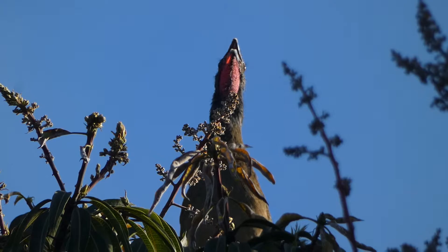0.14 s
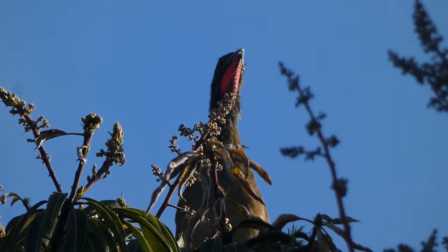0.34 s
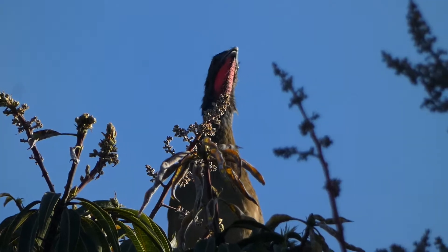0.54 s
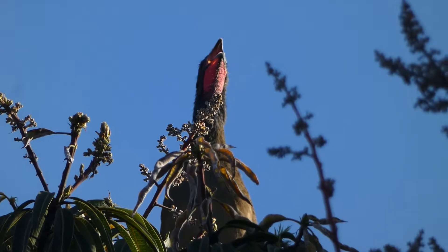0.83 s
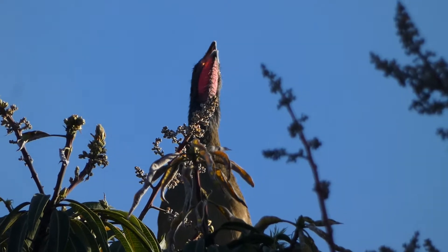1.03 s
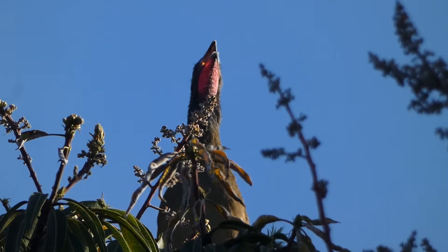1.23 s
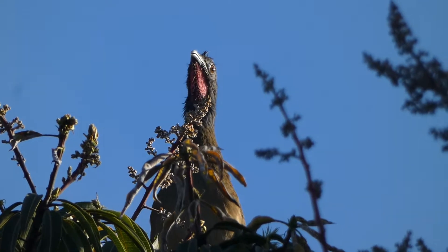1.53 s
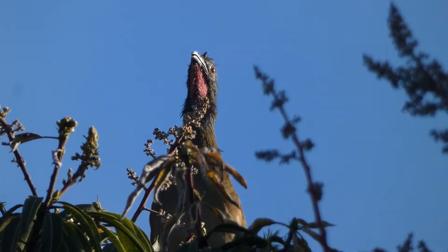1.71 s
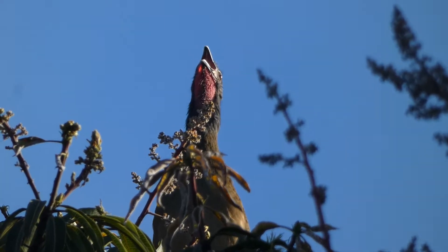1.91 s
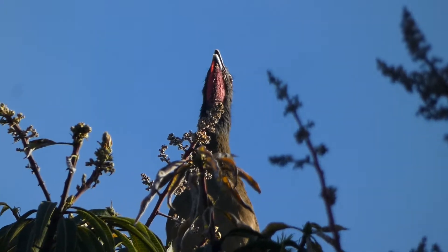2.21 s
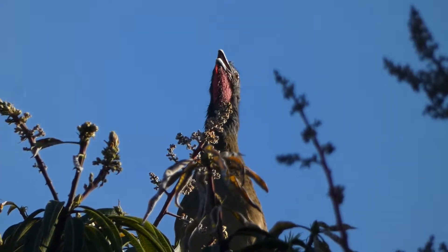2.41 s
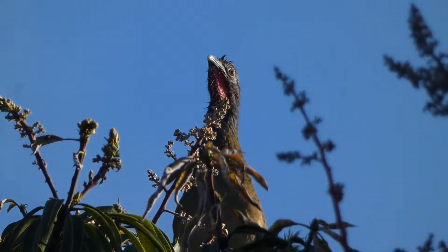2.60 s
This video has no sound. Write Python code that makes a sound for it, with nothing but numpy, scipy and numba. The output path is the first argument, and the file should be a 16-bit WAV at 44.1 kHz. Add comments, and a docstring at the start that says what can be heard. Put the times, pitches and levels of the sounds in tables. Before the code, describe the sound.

Harsh, rhythmic cackling of two big birds, raspy squawks alternating and overlapping with deeper gliding honks, fairly close outdoors in stereo; short leafy echoes, a faint wavering bird far right and soft low traffic rumble behind.

```python
"""Two large game birds duet from a treetop: a higher, rasping voice and a lower, honking one, each a train of
uneven syrinx pulses ringing a windpipe. Far off to the right another bird adds thin notes, each a single wavering
partial. Trees around the microphone echo all three as decaying noise, over a wash of distant traffic (shaped
noise) and a low hum (a wavering sine)."""
import sys
import numpy as np
from scipy import signal
from scipy.fft import rfft, irfft
from scipy.io import wavfile
from scipy.ndimage import uniform_filter1d
from numba import njit

SR = 44100
rng = np.random.default_rng(int(sys.argv[2]) if len(sys.argv) > 2 else 0)


def wav_record(signal):
    """Record a signal, one row per channel, as 16-bit PCM in the file named by sys.argv[1]."""
    frames = np.transpose(np.atleast_2d(signal))
    bounded = np.clip(frames, -1, 1)
    # unit amplitude maps onto the largest positive 16-bit level
    quanta = np.round(bounded * 32767).astype(np.int16)
    wavfile.write(sys.argv[1], SR, quanta)


def elevation(decibels):
    """Turn decibel levels (scalar or array-like) into linear amplitude ratios."""
    levels = np.asarray(decibels, float)
    return 10 ** (levels / 20)


N = 121275  # length in samples
LEFT_RIGHT = np.array([[1], [-1]])


@njit
def moving_bandpass(x, hz, width):
    """State-variable resonator whose centre may move from sample to sample."""
    y, b, l = np.empty(len(x)), 0., 0.
    for i in range(len(x)):
        g, k = np.tan(np.pi * hz[i] / SR), width / hz[i]
        v = (b + g * (x[i] - l)) / (1 + g * (g + k))
        b, l, y[i] = 2 * v - b, l + 2 * g * v, k * v
    return y


def fixed_bandpass(x, hz, width):
    """Resonator with its centre held still."""
    return moving_bandpass(x, np.full(len(x), 1. * hz), 1. * width)


def unit(x):
    """Scale to rms 1."""
    return x / np.sqrt(np.mean(x ** 2))


def walk(rate):
    """Smooth random wander of rms 1: noise averaged twice over 1 / rate seconds."""
    k = max(int(SR / rate), 1)
    return unit(uniform_filter1d(uniform_filter1d(rng.standard_normal(N), k), k))


def pan(left_minus_right_db):
    """Gains of the left and right channels, half the difference on each."""
    return elevation(.5 * LEFT_RIGHT * left_minus_right_db)


def shape(notes, attack_s, attack_share, release_s):
    """Breath gain of the notes, the row of the current note, time since it began and how far along it is."""
    t, notes = np.arange(N) / SR, np.array(notes)
    current = np.clip(np.searchsorted(notes[:, 0], t) - 1, 0, None)
    row = notes[current].T
    start, length, level, swell = row[:4]
    since = np.maximum(t - start, 0)
    along = np.clip(since / length, 0, 1)
    # the attack lengthens by a share of any note length over 0.1 s
    rise = np.clip(since / (attack_s + attack_share * np.maximum(length - .1, 0)), 0, 1)
    into_release = np.maximum(since - length + release_s, 0)
    gate = rise ** 2 * np.exp(-2 * into_release ** 2 / release_s ** 2)
    return gate * elevation(level + swell * (along - .5)), row, since, along


def syrinx(hz, rough):
    """Pulses of uneven spacing and size; rough flow adds a puff of noise to each cycle."""
    rough = np.clip(rough, 0, 1)
    jitter = rough * (.05 * walk(80) + .2 * walk(700))
    step = hz * np.clip(1 + jitter, .3, 3) / SR
    phase = np.cumsum(step)
    at = np.flatnonzero(np.diff(np.floor(phase))) + 1
    size = elevation((4.85 * rough * walk(1280))[at])
    # each pulse falls between two samples and is shared by them
    late = phase[at] % 1 / step[at]
    pulses = np.zeros(N)
    pulses[at - 1], pulses[at] = size * late, size * (1 - late)
    puffs = unit(np.exp(-(phase % 1) / 0.44) * rng.standard_normal(N))
    return np.sqrt(1 - rough ** 2) * unit(pulses - pulses.mean()) + rough * puffs


def windpipe(low, high, pipe, tuning, throat, lowest_db=0, pan_db=0):
    """Resonances of alternate sign, panned singly or all alike; steady breath evens the level."""
    out = 0
    for k, (hz, width, db, *own_pan_db) in enumerate(pipe):
        centre = hz * tuning * (throat if k == 1 else 1)  # the throat is the second resonance
        source = low if k < 2 else high
        narrow = moving_bandpass(source, centre, 1. * width)
        ring = unit(moving_bandpass(narrow, centre, 3. * width))
        level = elevation(db + (lowest_db if k == 0 else 0))
        out = out + (-1) ** k * level * ring * pan((own_pan_db or [pan_db])[0])
    return out / np.sqrt(uniform_filter1d(np.mean(out ** 2, axis=0), size=600))


# Notes of the higher bird in the treetop: start t/s, length t/s, mid-note level/dB, swell over the note/dB,
# settled throat resonance f/Hz (before wander), mid-note roughness (0-1)
HIGH_CALLS = [(.082, 0.13, -24.5, -10, 1406, 0.81), (.71, .12, -22.5, 0.5, 1459, 0.7),
              (.865, 0.052, -24, -9.5, 1250, 0.69), (.935, 0.035, -20, 4, 1290, 0.7),
              (.974, .038, -18.5, 16, 1366, 0.5), (1.015, .075, -27, -16, 1430, 0.5),
              (1.18, 0.152, -24, -12, 1301, .7), (1.858, 0.11, -23, 4, 1400, 0.67),
              (2.016, 0.051, -24, -11, 1216, 0.7), (2.082, 0.036, -19.5, 4.5, 1350, 0.66),
              (2.123, 0.1, -22, -7.5, 1434, 0.55), (2.338, 0.14, -24, -11.5, 1461, 0.71)]
# Its windpipe, settled: resonance f/Hz, width of the narrower of two filters f/Hz, relative level/dB
HIGH_WINDPIPE = [(1090, 620, -10), (1400, 180, -3), (1887, 175, -7.5), (3395, 644, -1.5), (5310, 740, -1.5),
                 (7034, 560, -9), (8846, 680, -15), (10290, 930, -23), (12900, 3000, -32.5)]


def high_bird():
    """Rasping notes: fast chaotic pulses near the pipe's own pitch, starting sharp; the throat drops into each."""
    pulse_hz = 1880  # once settled
    onset_sharp, onset_s = 0.096, 0.0041  # the pipe starts sharp by this share and settles
    throat_sharp, throat_s = .35, .008  # the throat opens sharp and drops into place
    clear_s = .014  # notes begin and end clearer than their middle
    earlier_db, earlier_s = -39, 0.59  # an earlier note still dying away at the start

    gain, row, since, _ = shape(HIGH_CALLS, attack_s=.005, attack_share=.6, release_s=.022)
    length, throat_hz, rough = row[1], row[4], row[5]
    since = np.where(since > 0, since, 1)  # what dies away at the start has long settled
    tuning = (1 + onset_sharp * np.exp(-since / onset_s)) * (1 + .012 * walk(70))
    clear = np.exp(-since / clear_s) + np.exp(-np.maximum(length - since, 0) / (2 * clear_s))
    source = syrinx(pulse_hz * tuning, rough * (1 - .6 * np.minimum(clear, 1)))
    drop = 1 + throat_sharp * np.exp(-since / throat_s)
    throat = throat_hz / HIGH_WINDPIPE[1][0] * drop * (1 + .035 * walk(45))
    voice = windpipe(source, source, HIGH_WINDPIPE, tuning, throat, pan_db=-4)
    earlier = elevation(earlier_db) * np.exp(-np.arange(N) / SR / earlier_s)
    return (gain + earlier) * voice


# Notes of the lower bird in the treetop: start t/s, length t/s, mid-note level/dB, swell over the note/dB,
# pulse rate at start f/Hz, at end f/Hz, lift of the lowest resonance at mid-note, level/dB
LOW_CALLS = [(.24, .14, -28, 12.5, 425.1, 564, 9), (.434, 0.067, -25.5, -8, 525.5, 467, 1.5),
             (.527, 0.05, -21, -5, 552.6, 548, 8), (.58, 0.048, -21.5, -10, 550.4, 559, 9),
             (.745, 0.16, -24.5, -7, 558.7, 500.6, 4), (1.37, .14, -27, 14.5, 445.9, 570.9, 12.5),
             (1.568, .06, -25, -4, 499.7, 470, 3.5), (1.663, 0.046, -21, -8.5, 548, 552.3, 7.5),
             (1.715, 0.052, -22.5, -13, 552.8, 560, 10.5), (1.88, 0.19, -24.5, -10, 558.9, 496.8, 5)]
# Its windpipe at the 555 Hz pulse rate, throat settled: resonance f/Hz, width of the narrower of two filters f/Hz,
# relative level/dB, left channel minus right level/dB
LOW_WINDPIPE = [(578, 110, -15.5, 1.5), (1039, 233, 1.5, -0.5), (1510, 530, -4, -5), (2280, 280, -7, -6),
                (3170, 680, -10.5, -1), (3840, 213, -6, -4), (4820, 930, -9.5, -3.5),
                (6600, 2100, -15.5, -4.5), (9300, 1520, -20.5, -6), (13200, 5300, -41, -4.5)]


def low_bird():
    """Honking notes that arch and glide: a steadier tone below, a rasp above; the lowest partial fills the middle."""
    tone_rough, rasp_rough = .35, .6  # steadier and chaotic side of the syrinx (0-1)
    pitch_arch = .05  # share by which pitch rises in mid-note
    throat_sharp, throat_s = .35, .008  # the throat opens sharp and drops into place

    gain, row, since, along = shape(LOW_CALLS, attack_s=.012, attack_share=.25, release_s=.012)
    start_hz, end_hz, lowest_db = row[4:7]
    arch = np.sin(np.pi * along)
    hz = (start_hz + (end_hz - start_hz) * along) * (1 + pitch_arch * arch)
    tuning = np.sqrt(hz / 555)  # the pipe follows the pitch part of the way
    throat = tuning * (1 + throat_sharp * np.exp(-since / throat_s))
    tone, rasp = syrinx(hz, tone_rough), syrinx(hz, rasp_rough)
    return gain * windpipe(tone, rasp, LOW_WINDPIPE, tuning, throat, lowest_db - 18 * (1 - arch))


# Notes of the far bird, off to the right: start t/s, length t/s, mid-note level/dB before flicker and pan,
# swell over the note/dB, mean pitch f/Hz
FAR_CALLS = [(.17, 0.24, -39, -16, 1252), (.64, 0.1, -42, 7, 1316), (.885, 0.094, -33.5, -2, 1231),
             (1.24, .13, -38, -10, 1279), (2.39, 0.31, -44, -29, 1247)]


def far_bird():
    """Thin, wavering, flickering notes of which only one partial carries."""
    flicker_db, pan_db = 5, -10  # rms flicker; left minus right
    gain, row, _, _ = shape(FAR_CALLS, attack_s=.012, attack_share=.25, release_s=.012)
    hz = row[4] * (1 + 0.022 * walk(50))
    tone = np.sqrt(2) * np.sin(2 * np.pi * np.cumsum(hz) / SR)
    return gain * tone * elevation(flicker_db * walk(50)) * pan(pan_db)


def fade(noise, t60):
    """Noise dying by 60 dB in t60 seconds, scaled to energy 1."""
    dying = noise * elevation(-60 * np.arange(SR) / SR / t60)
    return dying / np.sqrt(np.sum(dying ** 2))


# Echo from the trees around, by band: centre f/Hz, fall by 60 dB t/s, level against the direct sound/dB
TREE_ECHO = [(1086, 0.8, -19.5), (2610, 0.56, -10.5), (4780, 0.59, -17.5), (10000, 0.26, -15)]


def trees(x):
    """Near twigs scatter at once; the trees around give a thin tail, different on each side."""
    twigs_t60_s, twigs_db = 0.08, -3
    sides = []
    for _ in range(2):
        echo = 0
        for hz, t60, db in TREE_ECHO:
            noise = fixed_bandpass(rng.standard_normal(SR), hz, 0.23 * hz)
            echo = echo + elevation(db) * fade(noise, t60)
        bright = np.diff(rng.standard_normal(SR + 2), 2)  # differencing twice favours the treble
        echo = echo + elevation(twigs_db) * fade(bright, twigs_t60_s)
        sides.append(signal.fftconvolve(x, echo)[:N])
    return np.array(sides)


# Spectrum of the distant traffic at the microphone: f/Hz, relative level per Hz/dB
TRAFFIC_SPECTRUM = [(40, -23), (90, -1), (250, -3.5), (1000, -4.5), (3000, -14.5), (15000, -49)]


def traffic():
    """Distant wash of shaped noise, partly shared by both sides, its level drifting slowly."""
    level_db = -43.5  # rms, before the drift
    hz = np.arange(N // 2 + 1) * SR / N + 1
    f, db = np.array(TRAFFIC_SPECTRUM).T
    colour = elevation(np.interp(np.log(hz), np.log(f), db))
    mid, side = (irfft(rfft(rng.standard_normal(N)) * colour, N) for _ in range(2))
    return unit(mid + 0.67 * side * LEFT_RIGHT) * elevation(level_db + walk(1))


# Course of the background hum: t/s, level before wavering and side gains/dB
HUM_LEVEL = [(0, -76), (0.401, -54.5), (.75, -48), (1.3, -57), (2.75, -62)]


def hum():
    """Low sine wavering in pitch and level, a little stronger on the left."""
    hz = 91 * (1 + 0.025 * walk(5.1))
    tone = np.sqrt(2) * np.sin(2 * np.pi * np.cumsum(hz) / SR)
    level_db = np.interp(np.arange(N) / SR, *np.array(HUM_LEVEL).T) + 0.74 * walk(15)
    return np.array([[1.2], [.8]]) * tone * elevation(level_db)


def scene():
    """The birds, their echo from the trees, and the background."""
    birds = high_bird() + low_bird() + far_bird()
    return birds + trees(birds.mean(axis=0)) + traffic() + hum()


def roll_off(x):
    """The treble ends steeply here."""
    return signal.sosfilt(signal.butter(12, 15770, fs=SR, output="sos"), x)


def record(dry):
    """Small two-channel recorder, taking the mix as it stands."""
    return roll_off(dry)


dry = scene()
out = record(dry)
wav_record(out)
```